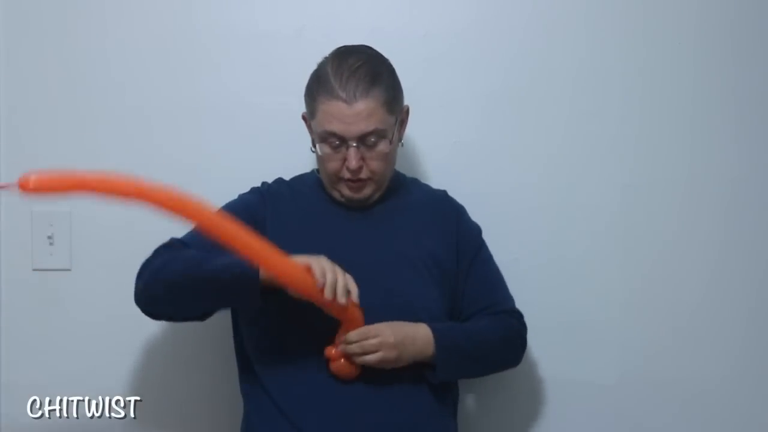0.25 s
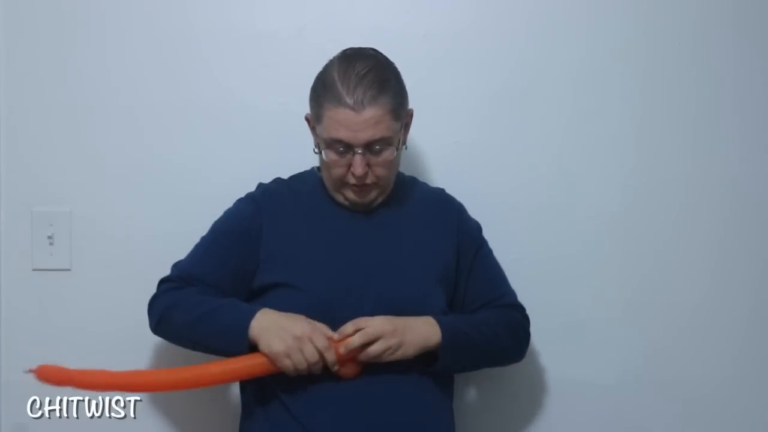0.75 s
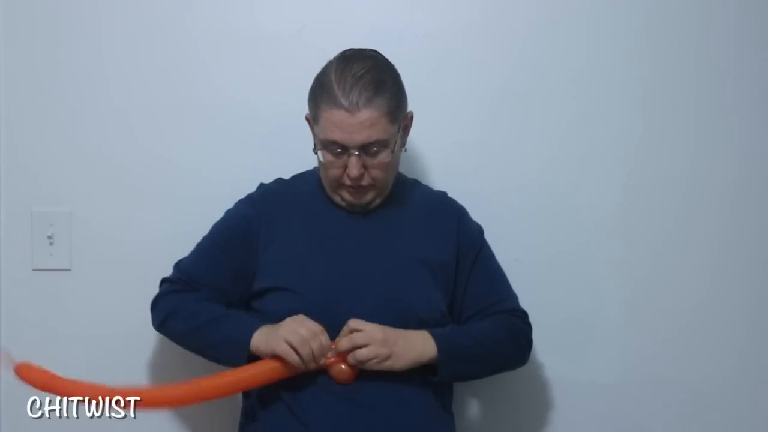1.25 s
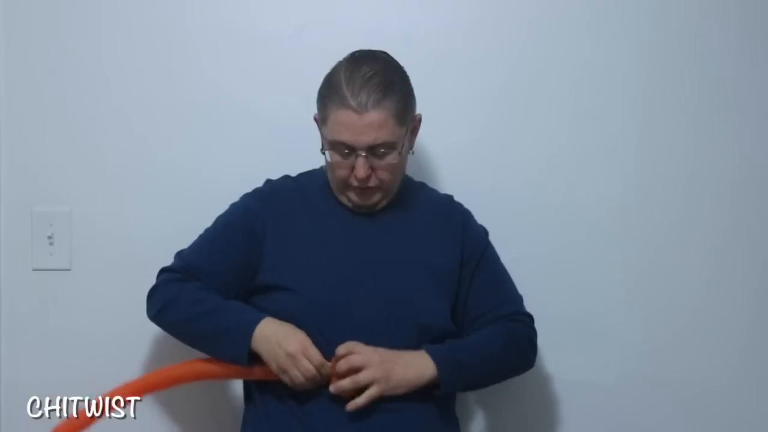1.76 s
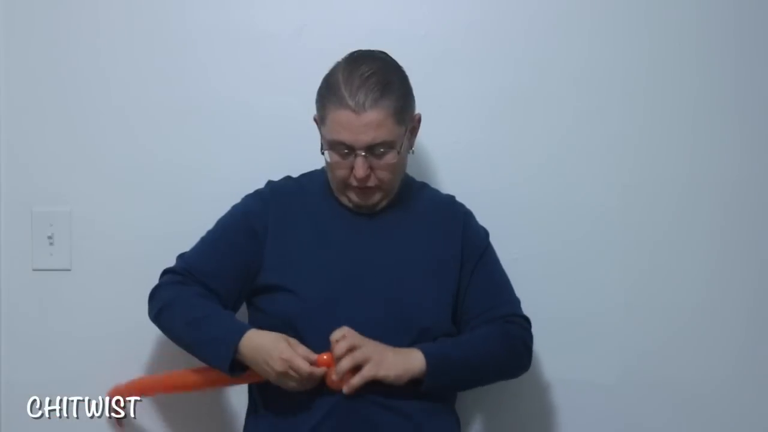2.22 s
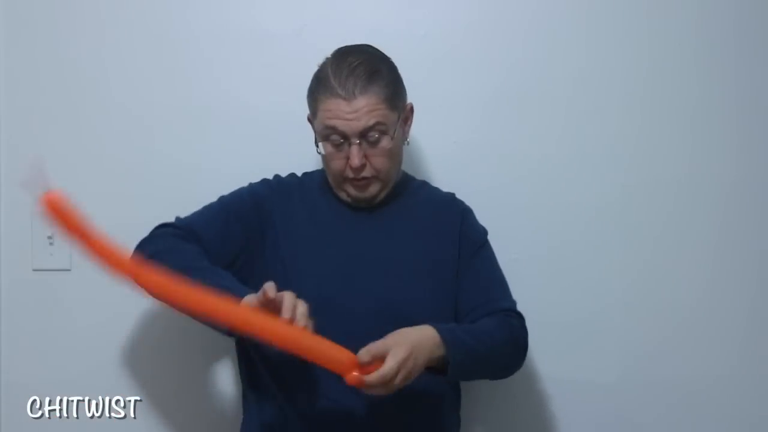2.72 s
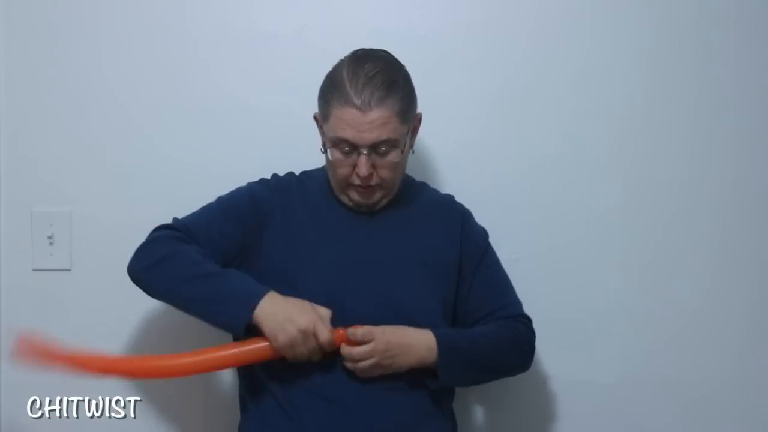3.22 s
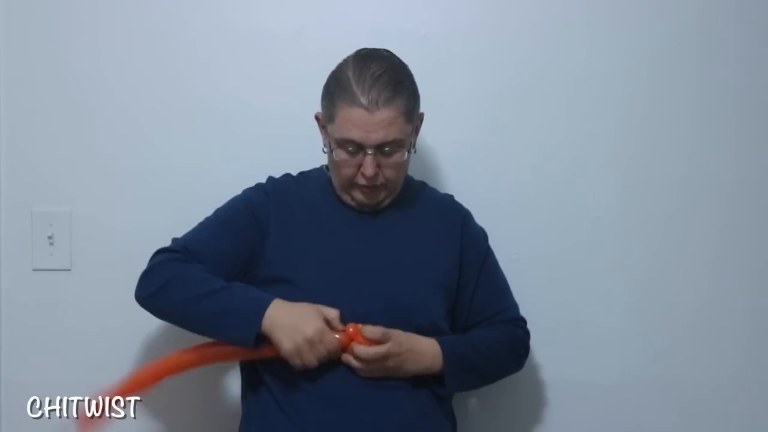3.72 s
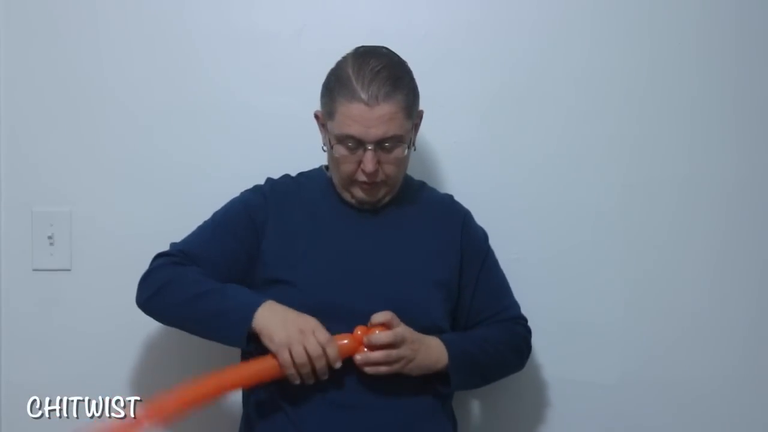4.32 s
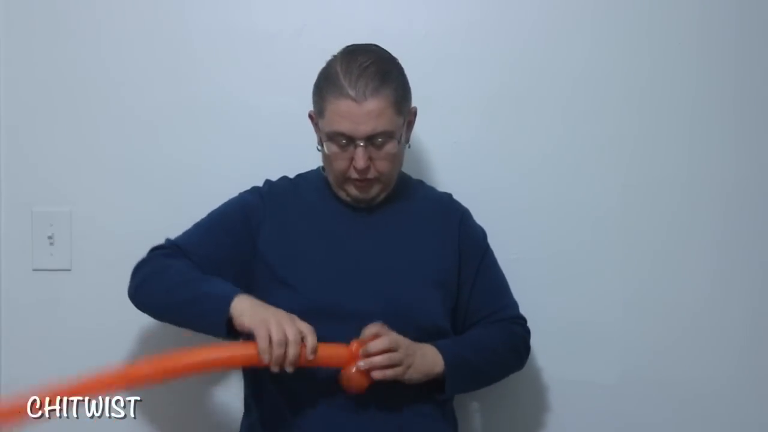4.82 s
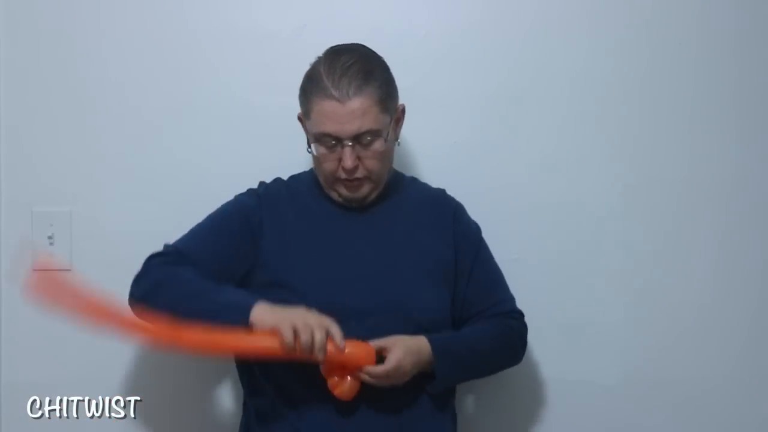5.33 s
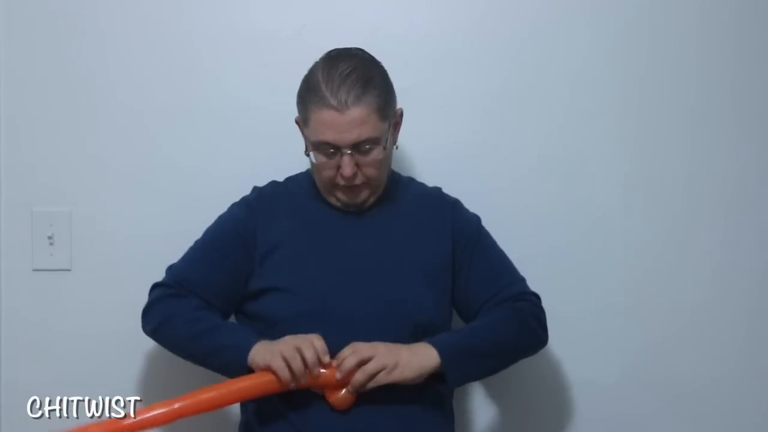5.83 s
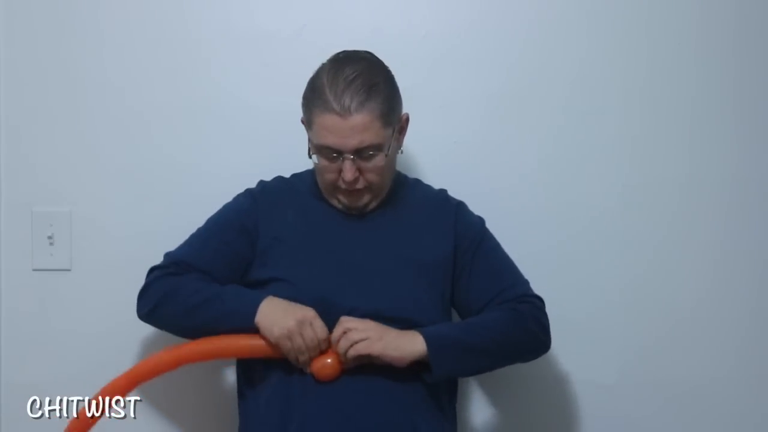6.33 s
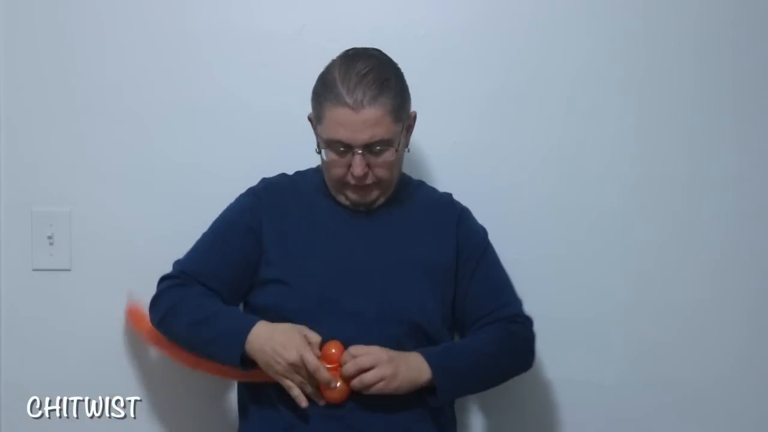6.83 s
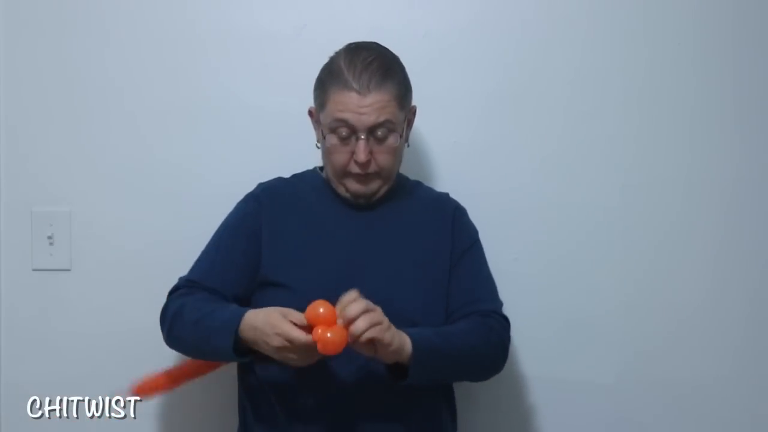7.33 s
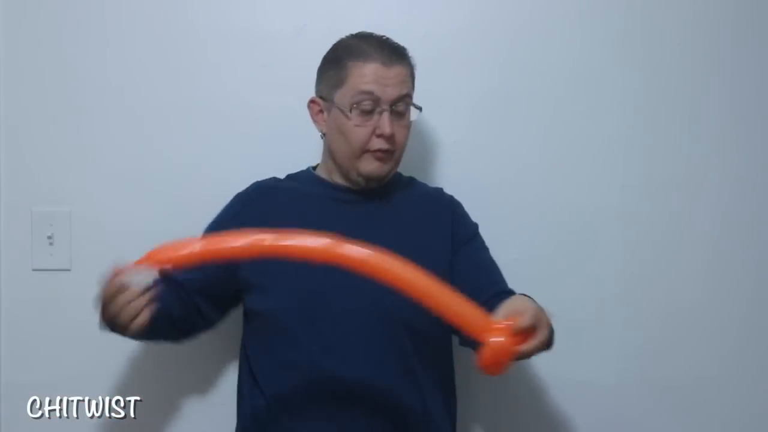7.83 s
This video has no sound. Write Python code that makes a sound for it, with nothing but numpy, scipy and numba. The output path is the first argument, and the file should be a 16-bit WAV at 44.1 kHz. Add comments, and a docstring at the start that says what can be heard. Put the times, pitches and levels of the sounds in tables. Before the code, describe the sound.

In a quiet, bare room with a short echo, a modelling balloon is rubbed and twisted by hand near a single microphone. Scratchy rubber squeaks come in irregular strokes with brief lulls, dotted with sharp snaps of slipping latex. Short moans, very thin high squeaks and occasional soft thumps of the long tube come in between. The last few snaps are higher, and a soft bump comes as the handling dies down.

```python
"""In a bare room, hands twist a long latex balloon into small bubbles.
Rubber sticks and slips on rubber and skin. Swarms of tiny slips ring the tight latex, the bubbles and
the long tube, with moans and thin squeaks in between. Fingertips rustle, single large slips snap, and
the tube bumps an arm. The room carries a short echo to one small microphone."""
import sys
import numpy as np
from scipy import signal
from scipy.fft import rfft, irfft
from scipy.io import wavfile
from numba import njit

SR = 44100
rng = np.random.default_rng(int(sys.argv[2]) if len(sys.argv) > 2 else 0)


def unload_wav(signal):
    """Save mono or channel-first audio to the path in sys.argv[1] as 16-bit WAV at rate SR, clipped to [-1, 1]."""
    wavfile.write(
        sys.argv[1],
        SR,
        np.round(np.clip(np.atleast_2d(signal).T, -1, 1) * 32767).astype(np.int16),
    )


N = 355446
CUTOFF_HZ = 15700   # the top of the treble


def from_db(db):
    """Turn decibels into a gain, a number to multiply a sound by."""
    return 10 ** (np.asarray(db) / 20)


def in_time(rows):
    """Join rows of (time, values...) with straight lines: one curve for each column of values."""
    times, *columns = np.transpose(rows)
    return [np.interp(np.arange(N) / SR, times, column) for column in columns]


def at_hz(points, hz):
    """Look up a frequency in rows of (frequency, value), with octaves evenly spaced."""
    freqs, values = np.transpose(points)
    return np.interp(np.log(hz + 1), np.log(freqs), values)


def rms_one(x):
    """Scale a signal so that its average strength (rms) is 1."""
    return x / np.sqrt(np.mean(x ** 2) + 1e-20)


def band(x, low_hz, high_hz, order=2):
    """Keep the sound between two frequencies; a higher order gives steeper edges."""
    sos = signal.butter(order, [low_hz, min(high_hz, .45 * SR)], "band", fs=SR, output="sos")
    return signal.sosfilt(sos, x)


def drift(rate_hz):
    """A smooth random wobble of size about 1; a higher rate makes it quicker."""
    r = np.exp(-2 * np.pi * rate_hz * 20 / SR)   # worked out at every 20th sample
    slow = signal.lfilter([1], [1, -2 * r, r * r], rng.standard_normal(N // 20 + 2002))[2000:]
    return np.interp(np.arange(N) / 20, np.arange(len(slow)), rms_one(slow))


def shares(db):
    """Gains that trade loudness among themselves: their power always adds up to 1."""
    gains = from_db(db)
    return gains / np.sqrt(np.sum(gains ** 2, axis=0))


def resonance(x, hz, width_hz):
    """Make a sound ring at one pitch; a smaller width rings longer."""
    r = np.exp(-np.pi * width_hz / SR)
    return rms_one(signal.lfilter([1, 0, -1], [1, -2 * r * np.cos(2 * np.pi * hz / SR), r * r], x))


@njit
def moving_resonance(x, hz, width_hz):
    """Make a sound ring at a pitch that can move from sample to sample."""
    out, y1, y2 = np.zeros(len(x)), 0., 0.
    for i in range(2, len(x)):
        r = np.exp(-np.pi * width_hz[i] / SR)
        push = (1 - r * r) / 2 * (x[i] - x[i - 2])
        y = push + 2 * r * np.cos(2 * np.pi * hz[i] / SR) * y1 - r * r * y2
        out[i], y1, y2 = y, y, y1
    return out


def slips(per_s, spread_db, clump_db, clump_hz):
    """Rubber sticks and lets go: random clicks of unequal size, whose level can swell in clumps."""
    sizes = from_db(spread_db * np.minimum(rng.exponential(1, N), 5)) * rng.choice([-1, 1], N)
    slipping = rng.random(N) < per_s / SR
    return rms_one(sizes * slipping * from_db(clump_db * drift(clump_hz)) + 1e-9)


def rubbed(clicks, hz, sharpness, low_hz, high_hz):
    """Slips ring one moving resonance, applied twice so that it stands out more clearly."""
    width = hz / sharpness
    ringing = moving_resonance(moving_resonance(clicks, hz, width), hz, width) / np.sqrt(width)
    return rms_one(band(ringing, low_hz, high_hz, order=3))


def stroke(start, climb, fall, sink_db, swing=(1, 1), grab_s=0.027):
    """Gain of one rub, every 50th sample: grab, climb, sink, let go. Swing scales (climb, sink) in dB."""
    t = np.arange(0, N + 50, 50) / SR - start
    end = climb + fall
    shape_db = np.interp(t, [0, climb, end], [-8 * swing[0], 0, -sink_db * swing[1]])
    let_go_db = 600 * np.maximum(t - end, 0)
    grab = np.clip(t / grab_s + 1, 0, 1) ** 2
    return from_db(shape_db - let_go_db) * grab


def together(gains):
    """Add overlapping strokes by their power, giving one gain for every sample."""
    total = np.sqrt(np.sum(np.square(gains), axis=0))
    return np.interp(np.arange(N) / 50, np.arange(len(total)), total)


def holding_hand(still_s=2.93, width_s=0.086):
    """Gain of the holding hand's rubbing: 1 while it shifts about, 0 at the moment it lies still."""
    return 1 - np.exp(-((np.arange(N) / SR - still_s) / width_s) ** 2)


def hands(part, rest_db, swing=(1, 1), grab_s=0.027):
    """How strongly the hands rub one part: their strokes, plus faint rubbing from the holding hand."""
    # Strokes on the twist: (start [s], climb [s], fall [s], sink before swing scales it [dB],
    # neck peak [dB], bubble peak [dB], fingers peak [dB])
    strokes = [(-.03, 0.027, 0.12, 17.5, -19, -30.5, -27.5), (0.204, 0.11, 0.1, -8, -29.5, -28, -68),
               (0.426, 0.0057, 0.26, 5.5, -23.5, -23, -41), (0.579, 0.037, 0.13, 14, -18, -20, -30),
               (.72, 0.078, 0.11, 21, -16, -21, -36.5), (.99, 0.084, 0.031, 19, -41, -34.5, -46),
               (1.12, 0.011, 0.037, 19, -26.5, -59, -46), (1.443, 0.034, 0.13, 7.5, -18, -27, -33),
               (1.6, 0.087, 0.31, 25, -19.5, -29.5, -29.5), (1.905, 0.025, 0.15, 19.5, -19, -22.5, -29.5),
               (2.085, 0.015, 0.15, -1.5, -20, -35, -37), (2.266, 0.0041, 0.064, 19.5, -18.5, -18, -47.5),
               (2.35, 0.012, 0.16, 14, -29, -32, -37), (2.606, 0.024, 0.11, 21, -32.5, -53, -34.5),
               (2.979, 0.0055, 0.024, 12, -39, -48, -46), (3.029, 0.025, 0.076, 0, -24.5, -27, -34),
               (3.153, 0.081, 0.046, 9.5, -15, -22, -22.5), (3.345, 0.063, 0.083, 26, -18.5, -23.5, -42),
               (3.529, 0.14, 0.17, 4.5, -18.5, -22, -29.5), (3.896, 0.0093, 0.11, 13, -17.5, -24.5, -40.5),
               (4.028, 0.016, 0.041, 11, -15.5, -22.5, -34), (4.069, 0.042, 0.16, 7.5, -19, -23, -24.5),
               (4.606, 0.017, 0.041, 13, -35.5, -48, -35), (4.673, 0.016, 0.13, -3.5, -25, -35.5, -32.5),
               (4.77, 0.0066, .13, 0.5, -23, -31, -33), (4.908, 0.0046, 0.14, 16, -20.5, -20.5, -27.5),
               (5.22, 0.061, 0.078, 7.5, -27, -26, -38), (5.519, 0.03, 0.037, 14, -35, -31.5, -47),
               (5.616, 0.081, 0.13, 46, -16.5, -23.5, -29), (5.93, 0.072, 0.039, -6.5, -30.5, -29, -44.5),
               (6.025, 0.022, 0.23, 12, -22.5, -23, -31.5), (6.27, 0.075, 0.052, 21, -18.5, -23, -29.5),
               (6.438, 0.021, 0.039, 9, -23, -24.5, -31), (6.545, 0.0086, 0.024, 3.5, -24.5, -37, -32),
               (6.604, 0.011, 0.034, 3.5, -22.5, -53, -29), (6.684, 0.0027, 0.22, 5, -32, -54, -37.5),
               (6.885, 0.013, 0.27, 26.5, -38.5, -32.5, -40.5), (7.19, 0.062, 0.086, -3.5, -36, -43.5, -41),
               (7.376, 0.012, 0.092, 6, -22.5, -69, -29), (7.51, 0.068, 0.14, 10, -23, -38, -37),
               (7.957, 0.0088, 0.048, 19.5, -53, -64, -33)]
    column = {"neck": 4, "bubble": 5, "fingers": 6}[part]
    gains = [from_db(row[column]) * stroke(*row[:4], swing, grab_s) for row in strokes]
    return together(gains) + from_db(rest_db) * holding_hand()


def neck(tightness):
    """Slips at the twist ring the latex; each of its tones swells, fades and slides as the grip wanders."""
    # Natural tones of the stretched latex: (pitch [Hz])
    skin_hz = [1216, 1657, 1948, 2130, 2630, 3080, 3600]
    clicks = slips(per_s=2000, spread_db=-1.0, clump_db=1.4, clump_hz=5.5)
    octaves = [np.clip(np.log2(hz / 2600), -1, 0.3) for hz in skin_hz]
    # Tighter latex moves loudness from the low tones to the high ones.
    weights = shares([1.43 * octave * (tightness + 5) + 2 * drift(27) for octave in octaves])
    skin = np.zeros(N)
    for k, hz in enumerate(skin_hz):
        sliding_hz = hz * np.exp(0.082 * drift(10.7))
        tone = rms_one(moving_resonance(clicks, sliding_hz, np.full(N, hz / 5)))
        skin += (-1) ** k * weights[k] * tone   # flipped signs join neighbours without a dip
    return hands("neck", rest_db=-41) * rms_one(band(skin, 1096, 5570, order=3))


def bubble(hz):
    """Slips between two bubbles ring the air in the squeezed one, along with a higher overtone."""
    clicks = slips(per_s=2500, spread_db=3.0, clump_db=3.5, clump_hz=9.3)
    air = rubbed(clicks, hz, sharpness=1.74, low_hz=464, high_hz=2090)
    overtone = rubbed(clicks, 1.806 * hz, sharpness=2.5, low_hz=490, high_hz=2180)
    return hands("bubble", rest_db=-48, swing=(0.44, 0.72)) * rms_one(air - from_db(-14) * overtone)


def fingers():
    """Fine slips under the fingertips: a crisp, flickering rustle, slightly duller when it is soft."""
    gain = hands("fingers", rest_db=-56, swing=(1, 1.71), grab_s=0.012)
    clicks = slips(per_s=2500, spread_db=2.0, clump_db=0.0, clump_hz=66)
    edges_hz = np.geomspace(4500, 15000, 7)
    step_db = -2.4 + 0.005 * (20 * np.log10(gain + 1e-6) + 32)   # from one band to the next
    weights = shares([step_db * k + 4 * drift(14) for k in range(6)])
    bands = [rms_one(band(clicks, low, high)) for low, high in zip(edges_hz, edges_hz[1:])]
    return gain * sum((-1) ** k * weights[k] * bands[k] for k in range(6))


def tube(sink_db_per_s=20, rest_db=-48.5):
    """The air in the balloon's long end groans when it is dragged along an arm."""
    # Drags of the tube: (start [s], length [s], level [dB], pitch of the air inside [Hz])
    drags = [(-.02, 0.17, -25, 486), (0.216, 0.35, -32.5, 463), (2.189, 0.077, -26.5, 290),
             (2.335, 0.25, -34, 347), (3.529, 0.22, -32.5, 475), (3.698, 0.12, -32.5, 370),
             (3.91, 0.23, -34, 450), (4.714, 0.2, -28, 288), (4.892, 0.15, -27.5, 476),
             (5.171, 0.17, -31, 460), (5.597, 0.24, -30, 353), (6.363, 0.093, -27, 485),
             (6.826, 0.077, -38.5, 290), (7.044, 0.024, -31.5, 400), (7.361, 0.12, -34, 302),
             (7.81, 0.031, -31, 313.4)]
    gain = together([from_db(level_db) * stroke(start, 0.0025, length, sink_db_per_s * length)
                     for start, length, level_db, _ in drags])
    air_hz, = in_time([(start + length / 2, hz) for start, length, _, hz in drags])
    clicks = slips(per_s=1500, spread_db=1.0, clump_db=3.5, clump_hz=5.9)
    groan = rubbed(clicks, air_hz, sharpness=0.89, low_hz=139, high_hz=680)
    return (gain + from_db(rest_db) * holding_hand()) * groan


def moans():
    """Uneven slips lock on to one pitch: a throbbing tone that swells and fades."""
    # Spells of moaning rubber: (start [s], length [s], level [dB], pitch [Hz])
    spells = [(0.057, 0.42, -34, 580), (0.602, 0.054, -23, 1004), (1.036, 0.06, -32.5, 2620),
              (1.045, 0.052, -30.5, 3580), (2.505, 0.11, -35, 437), (4.453, 0.028, -34, 800),
              (4.93, 0.13, -33, 490), (5.51, 0.11, -27.5, 840), (5.7, 0.13, -25, 665),
              (5.93, .17, -27, 806), (6.022, 0.13, -19.5, 3350), (6.547, 0.049, -26, 3920),
              (7.576, 0.049, -27, 770), (7.589, 0.073, -23.5, 2350), (7.816, 0.11, -32.5, 212)]
    out, warm_up = np.zeros(N), 2000   # samples skipped while the ringing builds
    for start, length, level_db, hz in spells:
        count, width = int(length * SR), 0.19 * hz
        noise = rng.standard_normal(SR // 2)[:count + warm_up]
        tone = resonance(resonance(noise, hz, width), hz, width)[warm_up:]
        swell = np.sin(np.pi * np.arange(count) / count) ** 0.12
        out[round(start * SR):][:count] += from_db(level_db) * tone * swell
    return out


def ring(start, level_db, hz, fade_s):
    """A pure tone that builds up over two cycles and dies away by 60 dB in fade_s."""
    out, first = np.zeros(N), round(start * SR)
    t = np.arange(min(int(fade_s * SR), N - first)) / SR
    gain = from_db(level_db - 60 * t / fade_s) * np.minimum(hz * t / 2, 1)
    out[first:first + len(t)] = gain * np.sin(2 * np.pi * hz * t)
    return out


def knocks(fade_s=0.1):
    """The tube bumps an arm and its air rings; a softer ring of the same pitch follows a moment later."""
    # Soft bumps of the tube: (time [s], level [dB], pitch [Hz])
    bumps = [(0.339, -20, 305), (1.967, -15, 292), (2.8, -26, 265), (3.708, -20.5, 350), (7.812, -19, 338)]
    return sum(ring(start, level_db, hz, fade_s) + ring(start + 0.00584, level_db - 5.5, hz, fade_s)
               for start, level_db, hz in bumps)


def snaps(burst_s=0.0086, crack_s=0.0015, crack_db=-9.5):
    """One large slip makes a quickly dying burst of noise, a bright crack and a short ring of the latex."""
    # Single large slips: (time [s], level [dB], ringing pitch [Hz])
    large_slips = [(0.595, -6, 1820), (1.127, -23, 3180), (1.482, -10, 1660), (2.097, -10.5, 1550),
                   (2.265, -3, 1550), (3.186, -13, 1280), (3.242, -4.5, 1060), (3.532, -9.5, 1620),
                   (3.76, -5, 1262), (4.032, -10, 1880), (4.688, -21, 3740), (4.778, -4.5, 1690),
                   (4.8, -11, 3280), (4.916, -7, 1116), (5.659, -4.5, 1015), (6.273, -11.5, 1270),
                   (6.357, -6, 1060), (6.462, -15.5, 2720), (6.69, -10.5, 2810), (6.891, -10, 2287),
                   (7.378, -19, 1900), (7.444, -10, 3120), (7.51, -9.5, 2770), (7.546, -9.5, 2680)]
    out, t = np.zeros(N), np.arange(SR // 10) / SR
    for start, level_db, hz in large_slips:
        burst = band(rng.standard_normal(len(t)), hz / 3.08, hz * 2.61, order=3) * np.exp(-t / burst_s)
        crack = band(rng.standard_normal(len(t)) * np.exp(-t / crack_s), hz, CUTOFF_HZ)
        snap = burst / np.abs(burst).max() + from_db(crack_db) * crack / np.abs(crack).max()
        out[round(start * SR):][:len(t)] += from_db(level_db) * snap
        out += ring(start, level_db - 4, hz, fade_s=0.038)
    return out


def squeaks(sharpness=10):
    """A fingertip stutters on tight latex; each slip rings three patches at close, very high pitches."""
    # Stutters: (start [s], length [s], level before scaling by length [dB], pitch [Hz], slips [1/s])
    stutters = [(1.014, 0.12, -63.5, 11100, 390), (1.35, 0.14, -54.5, 9000, 460),
                (5.166, 0.12, -59, 11500, 360), (6.705, 0.085, -59, 14000, 110),
                (6.768, 0.056, -66, 11200, 250), (7.593, 0.086, -57.5, 9350, 530)]
    out = np.zeros(N)
    for start, length, level_db, hz, per_s in stutters:
        gap_luck, *patch_luck = rng.standard_normal((4, 200))
        times = np.cumsum(np.exp(0.68 * gap_luck) / per_s)
        inside = times < length
        tone, width = 0, hz / sharpness
        for ratio, luck in zip((0.88, 1, 1.1), patch_luck):
            clicks = np.full(SR // 4, 1e-18)
            clicks[(times[inside] * SR).astype(int)] = from_db(2.6 * luck[inside])
            tone = tone + resonance(resonance(clicks, ratio * hz, width), ratio * hz, width)
        squeak = band(tone, 0.75 * hz, CUTOFF_HZ) / np.sqrt(length)
        out[round(start * SR):][:len(squeak)] += from_db(level_db) * squeak
    return out


def room_echo(x, level_db=-10):
    """After a tiny gap, reflections from the walls blur into a tail; each octave fades at its own rate."""
    # How long the room rings: (frequency [Hz], time to fade by 60 dB [s])
    fade_times = [(150, 0.42), (1000, 0.44), (4000, 0.52), (8000, 0.22)]
    t = np.arange(int(.7 * SR)) / SR
    tail = np.zeros(len(t))
    for low_hz in 100 * 2 ** np.arange(8.):
        fade_s = at_hz(fade_times, np.sqrt(2) * low_hz)
        tail += band(rng.standard_normal(len(t)), low_hz, 2 * low_hz) * from_db(-60 * t / fade_s)
    tail *= np.clip((t - .003) / 0.004, 0, 1)
    return from_db(level_db) * signal.fftconvolve(x, tail / np.sqrt(np.sum(tail ** 2)))[:N]


def room_tone(level_db=-66):
    """The steady, faint hush of the room and the microphone."""
    # Tone colour of the hush: (frequency [Hz], relative level [dB])
    hush = [(60, 18), (300, 16), (4000, -1.5)]
    colour = from_db(at_hz(hush, np.arange(N // 2 + 1) * SR / N))
    return from_db(level_db) * rms_one(irfft(rfft(rng.standard_normal(N)) * colour, N))


def scene():
    """All the sounds of the balloon and their echo, in one channel."""
    # How the twist is held: (time [s], tightness [higher is brighter], squeezed bubble's pitch [Hz])
    grip = [(0, -3, 670), (.25, -10.5, 755), (.8, -3, 930), (1.5, -3, 1080), (2.3, -5.5, 890),
            (2.6, -1, 1050), (4.2, -2.5, 973), (4.55, -9.5, 940), (4.83, 13, 1100), (5.3, -4, 850),
            (5.8, -6.5, 804), (6.1, -0.5, 1040), (6.6, -1, 920), (8.06, -2, 850)]
    tightness, bubble_hz = in_time(grip)
    balloon = tube() + knocks() + bubble(bubble_hz) + neck(tightness) + moans() + snaps() + squeaks()
    balloon += fingers()
    return (balloon + room_echo(balloon))[None]


def record(dry):
    """A small microphone hears the hush too, loses the bass, clips any overload and cuts the top treble."""
    bass_cut = signal.butter(3, 80, "high", fs=SR, output="sos")
    treble_cut = signal.ellip(10, .5, 60, CUTOFF_HZ, fs=SR, output="sos")
    thin = signal.sosfilt(bass_cut, dry + room_tone())
    return signal.sosfilt(treble_cut, np.clip(thin, -1, 1))


dry = scene()
out = record(dry)
unload_wav(out)
```